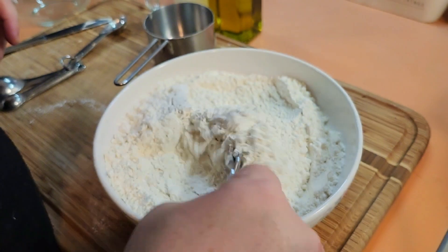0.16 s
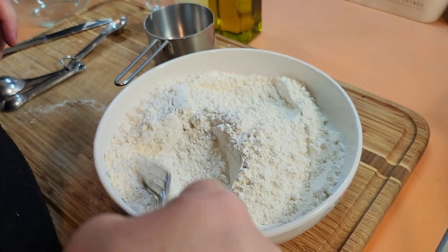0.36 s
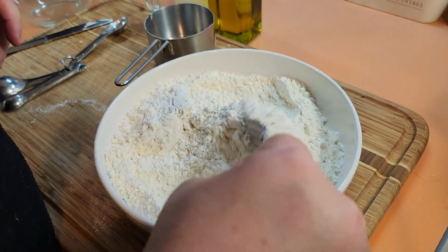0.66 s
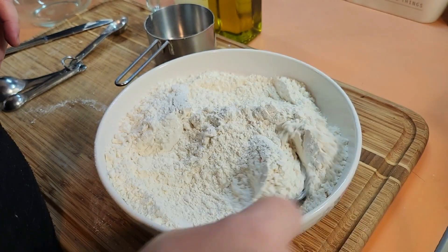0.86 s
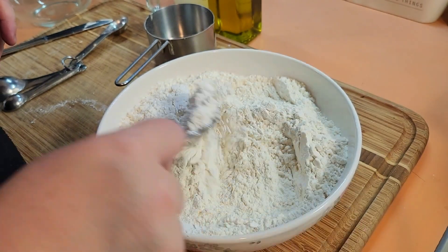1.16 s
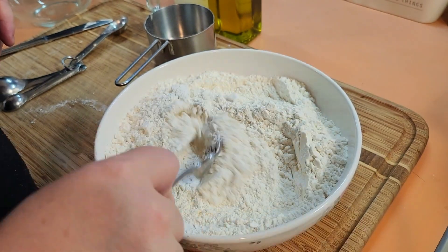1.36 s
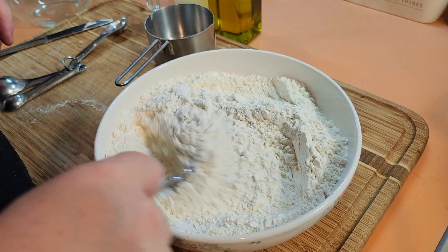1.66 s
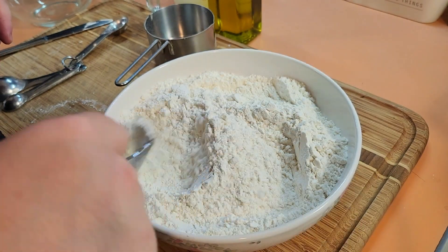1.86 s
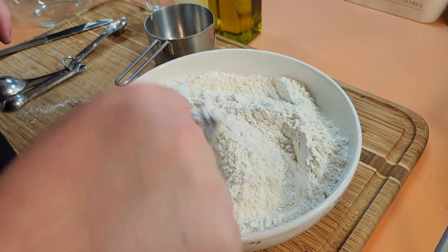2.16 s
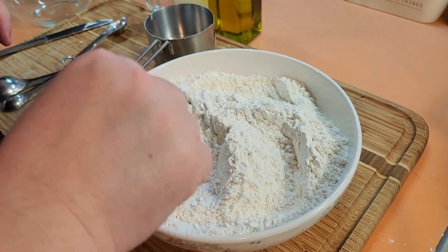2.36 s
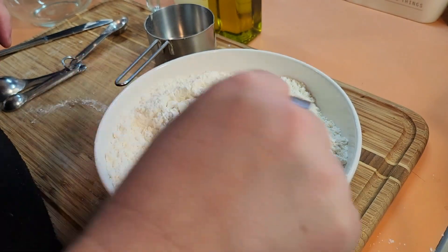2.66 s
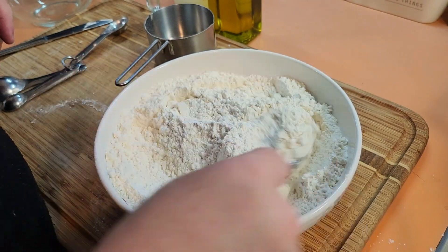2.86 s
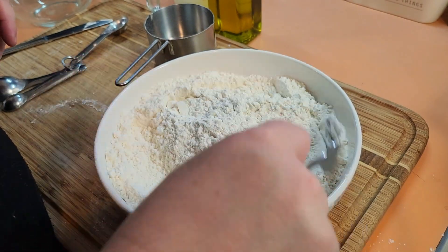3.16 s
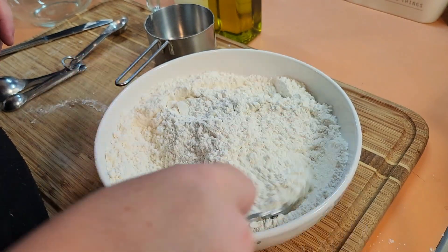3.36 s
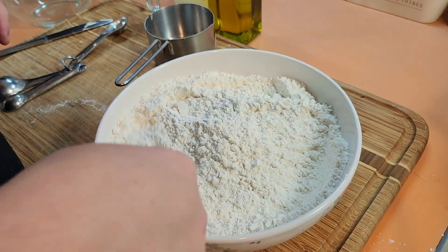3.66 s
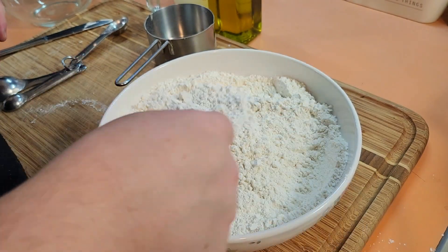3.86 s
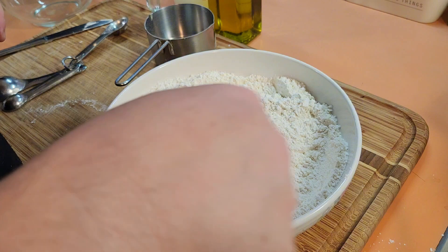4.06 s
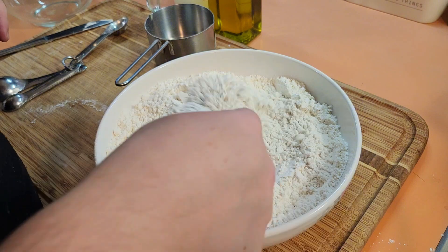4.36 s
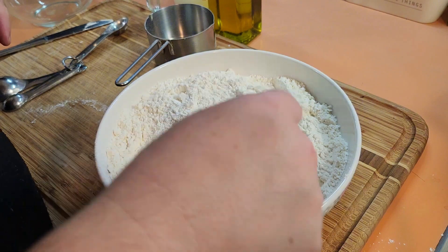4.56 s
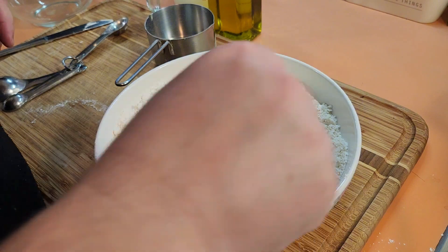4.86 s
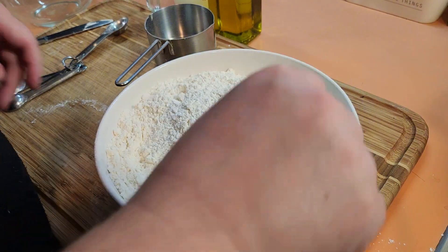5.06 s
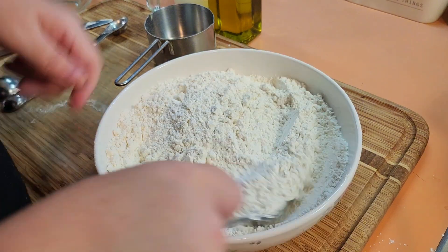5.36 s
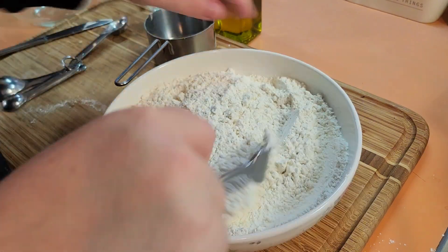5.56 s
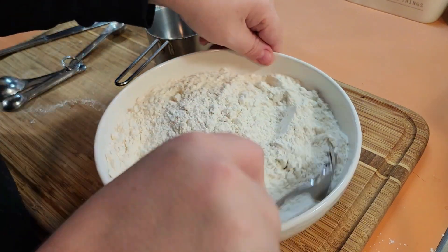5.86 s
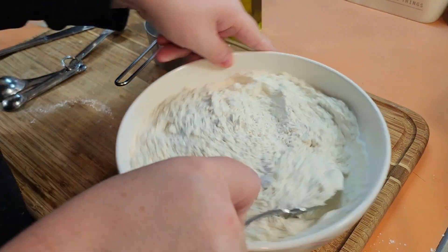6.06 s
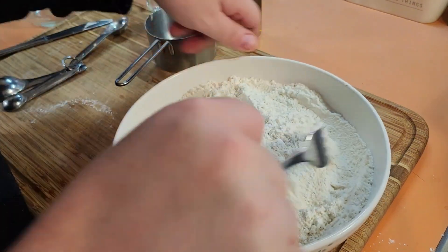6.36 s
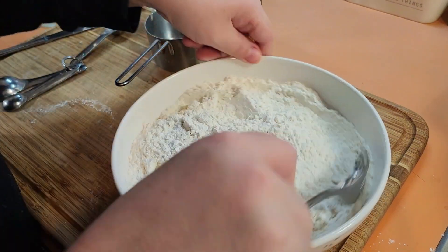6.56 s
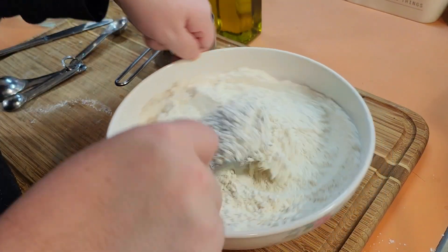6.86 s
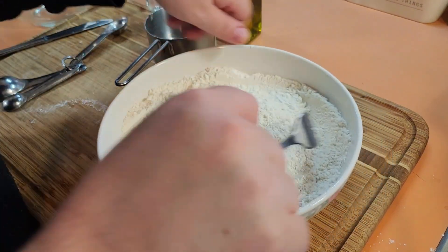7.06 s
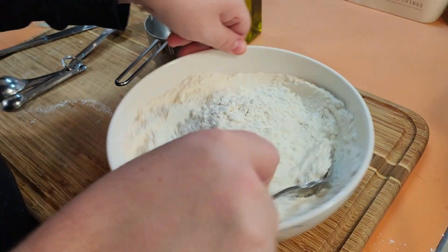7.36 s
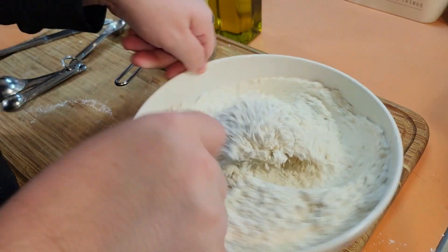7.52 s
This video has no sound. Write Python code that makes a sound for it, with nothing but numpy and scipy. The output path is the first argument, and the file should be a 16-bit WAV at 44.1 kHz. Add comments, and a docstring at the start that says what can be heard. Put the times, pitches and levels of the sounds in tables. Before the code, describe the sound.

Dull cushioned knocks and hissing fork strokes through flour in a ceramic bowl, a brief piercing tine squeal early, then hollow drags across a wooden board.

```python
"""A steel fork stirs dry flour in a ceramic bowl on a wooden board in a small kitchen.
Landings excite decaying modes of board and bowl, cushioned by flour; dense random slips through the
fork's resonances make the tines hiss on dusty glaze, and heaps of flour tumble with filtered slips.
Once the tines screech on bare glaze, as judder plus locked modes; late on, shoves grind the bowl's
foot over the board. Counter rumble and room noise are filtered noise."""
import sys
import numpy as np
from scipy import signal
from scipy.fft import rfft, irfft, next_fast_len
from scipy.io import wavfile
from scipy.ndimage import uniform_filter1d

SR = 44100
rng = np.random.default_rng(int(sys.argv[2]) if len(sys.argv) > 2 else 0)


def digitize_waveform(pressure):
    """Quantize a signal to 16-bit integers and store it at the path in sys.argv[1].

    Rows of a 2-D input are taken as channels; values are limited to [-1, 1].
    """
    field = np.atleast_2d(pressure).T
    bounded = np.clip(field, -1, 1)
    quanta = np.round(bounded * 32767).astype(np.int16)
    wavfile.write(sys.argv[1], SR, quanta)


N = 339129
TIME_S = np.arange(N) / SR
RING_S = TIME_S[:SR // 2]  # time axis of one ringing event

# modes of the ceramic wall: mode_hz, level_db, t60_s (undamped)
BOWL_MODES = [(1125, -4, .12), (1345, -4, .16), (1707, -8, .17), (1830, -12, .18), (2104, -4, .15),
              (2353, -8, .14), (2736, -2, .09), (2914, -1, .12), (3267, -5, .1), (3644, -11, .1),
              (4205, -5, .22), (4300, -3, .18), (5590, -3, .14), (5900, -12, .16), (7197, -12, .12),
              (7750, -8, .09), (7994, -13, .12), (9921, -16, .07), (10720, -16, .08)]
# shoves that drag the bowl over the board: top_s (fastest), rise_s, fall_s, level_db
SHOVES = [(6.018, 0.23, 0.31, -45), (6.67, 0.2, 0.23, -50.5), (6.89, 0.13, 0.17, -47.5),
          (7.422, 0.23, 0.31, -45)]


def undb(db):
    """Decibels to gain."""
    return 10 ** (np.asarray(db) / 20)


def unit(x):
    """Scale to rms 1."""
    return x / np.sqrt(np.mean(x ** 2))


def fade(t_s, t60_s):
    """Exponential decay by 60 dB in t60_s."""
    return np.exp(-np.log(1000) * t_s / t60_s)


def shape(x, gain):
    """Filter by a gain given as a function of frequency."""
    size = next_fast_len(x.shape[-1] + 4096)
    hz = np.maximum(np.arange(size // 2 + 1) * SR / size, 1)
    return irfft(rfft(x, size) * gain(hz), size)[..., :x.shape[-1]]


def colour(x, points):
    """Filter by a spectrum of (Hz, dB) points, interpolated over log frequency."""
    at_hz, db = np.transpose(points)
    return shape(x, lambda hz: undb(np.interp(np.log(hz), np.log(at_hz), db)))


def add(out, start_s, x):
    """Mix x in at start_s, cutting what lies outside."""
    start = int(start_s * SR)
    x = x[..., max(-start, 0):N - start]
    first = max(start, 0)
    out[..., first:first + x.shape[-1]] += x


def pan(db):
    """Left and right gains; db is left minus right."""
    return undb(np.array([[db], [-db]]) / 2)


def walk(rate_hz):
    """Smooth random wander of spread near 1."""
    size = int(SR / rate_hz)
    steps = np.repeat(rng.standard_normal(N // size + 1), size)
    smooth = uniform_filter1d(uniform_filter1d(steps, size), size)
    return 1.3 * smooth[:N]


def slips(rate_hz, spread_db):
    """Tiny random slips of uneven size; each reaches the two channels with its own weight."""
    hits = rng.random(N) < rate_hz / SR
    sizes = undb(spread_db * rng.standard_normal(N))
    return hits * sizes * rng.standard_normal((2, N))


def swell(top_s, rise_s, fall_s):
    """The samples of one push, and its pressure, which sets in quickly, builds to the top and lets go."""
    begin_s, end_s = top_s - rise_s, top_s + fall_s
    span = slice(max(int(begin_s * SR), 0), int(end_s * SR))
    return span, np.interp(TIME_S[span], [begin_s, top_s, end_s], [0, 1, 0]) ** .7


def mode(hz, t60_s):
    """One freely ringing resonance: a decaying sine."""
    return np.sin(2 * np.pi * hz * RING_S) * fade(RING_S, t60_s)


def fork(x, flicker_db):
    """Friction through the fork's broad resonances, each coming and going as the contact moves."""
    # centre_hz, width_hz, level_db
    resonances = [(1200, 3300, -3.5), (2030, 630, 0.5), (4110, 1500, -1.5), (5620, 390, -3), (7810, 720, 1),
                  (9230, 820, -11.5), (12000, 630, -3.5)]
    out = 0
    for f, width, db in resonances:
        band = shape(x, lambda hz: 1 / (1 + 1j * (hz / f - f / hz) * f / width) ** 1.18)
        out = out + band * undb(db + flicker_db * walk(rate_hz=43))
    return out


def thud(cushion_hz, weight_db):
    """A blow into the board: flour cushions the upper modes, a heavy hand drives the lower ones."""
    # bowl, board and counter together: mode_hz, level_db, t60_s (nominal, before spot and weight)
    board_modes = [(54.6, -19, 0.24), (122, -15, 0.24), (197, -19, .1), (286, -8.5, 0.28),
                   (330, -3.5, 0.31), (374.1, 3.5, 0.064), (480.4, -0.5, 0.091), (568, -6, 0.065),
                   (640, -3.5, .12), (761, 1.5, 0.068), (835, 1, 0.048)]
    body = 0
    spot = rng.standard_normal((len(board_modes), 2))  # each spot of the bowl favours other modes
    for k, (hz, db, t60_s) in enumerate(board_modes):
        gain = undb(db + weight_db / (1 + (hz / 290) ** 4) + 2 * spot[k, 0])
        sign = (-1) ** (k // 3)
        body = body + gain * mode(hz * (1 + 0.011 * spot[k, 1]), t60_s) * sign
    body = body * np.minimum(0.51 + RING_S / 0.028, 1)  # the load builds as the four tines bed in
    body = body * (1 + 2.4 * np.exp(-(RING_S / .021) ** 2))  # the pressing fork soon damps the first swings
    body = signal.sosfilt(signal.butter(4, cushion_hz, fs=SR, output="sos"), body)
    return body / np.abs(body).max()


def knocks():
    """Each landing thuds, the tines chatter for a moment and the bowl rings, choked by the flour."""
    # fork landings, relative levels: start_s, thud_db, cushion_hz (cut-off), hand_weight_db, tick_db, ring_db
    landings = [(-.008, -29, 820, 7, -68, -58), (0.417, -36, 780, 5, -70, -58),
                (0.855, -33, 673, 16, -52, -90), (1.557, -25.5, 990, -13.5, -44, -41.5),
                (1.918, -27, 845, 4.5, -46.5, -48), (2.388, -23, 1096, 2, -52, -71),
                (2.772, -29.5, 604, 10, -45.5, -59.5), (3.188, -32, 395, -4, -45.5, -56),
                (4.232, -66, 500, 3.5, -52, -61), (4.633, -30.5, 460, 0.5, -48, -48.5),
                (5.010, -23.5, 790, 11.5, -38.5, -50), (5.390, -55, 605, -0.5, -48.5, -49),
                (5.730, -29, 693, 7.5, -42, -83), (6.473, -22, 667, 2.5, -34, -45.5),
                (7.128, -27, 767, 8.5, -46.5, -73.5)]
    # dull jolts of the bowl on the board: start_s, level_db, cushion_hz (cut-off)
    jolts = [(.906, -35, 130), (5.968, -32, 448), (6.029, -29.5, 500), (6.494, -42, 363), (6.612, -34, 240),
             (6.854, -39, 330), (7.423, -31, 420)]
    soft_ring_hz, hard_tick_db = 2330, -29.5  # a soft tick rings near this pitch; a hard one, an octave higher
    low, high = np.zeros(N), np.zeros((2, N))
    chatter = unit(fork(slips(rate_hz=2400, spread_db=3.0), flicker_db=5))
    for start_s, db, cushion_hz, weight_db, tick_db, ring_db in landings:
        add(low, start_s, undb(db) * thud(cushion_hz, weight_db))
        age_s = np.maximum(TIME_S - start_s, 0)
        high += undb(tick_db - 9.0) * chatter * np.minimum(age_s / 0.0029, 1) * fade(age_s, t60_s=0.11)
        # harder contact rings higher modes of the wall
        ring_hz = soft_ring_hz * (1 + undb(tick_db - hard_tick_db))
        ring = 0
        for hz, mode_db, t60_s in BOWL_MODES:
            detour_db = 10 * abs(np.log2(hz / ring_hz))  # 10 dB per octave away from ring_hz
            gain = undb(mode_db - detour_db + 2 * rng.standard_normal((2, 1)))
            ring = ring + gain * mode(hz, .5 * t60_s)
        add(high, start_s, undb(ring_db) * np.minimum(RING_S / 0.0039, 1) * ring / ring.std() / 10)
    for start_s, db, cushion_hz in jolts:
        add(low, start_s, undb(db) * thud(cushion_hz, weight_db=-3.5))
    return low * pan(db=3.0) + high


def wall(x, width_hz, boost_db):
    """Rubbing brings out the bowl's modes, broadened by the flour lying on them."""
    def gain(hz):
        modes = sum(undb(db) / (1 + 2j * (hz - f) / width_hz) for f, db, _ in BOWL_MODES)
        return 1 + undb(boost_db) * modes
    return shape(x, gain)


def scrapes():
    """Powder crushed between tines and glaze: dense slips that swell and stop as the fork lifts."""
    # tines sliding on floury glaze: top_s (loudest), length_s, level_db, tilt_db_per_octave
    slides = [(0.043, 0.65, -58, -3), (0.488, 0.17, -52, 1), (1.618, 0.16, -55, -1),
              (2.011, 0.094, -52.5, 3), (2.467, 0.052, -43, 1), (2.863, 0.12, -54, 0),
              (3.377, 0.072, -58.5, -5), (3.547, 0.71, -58.5, -2.5), (4.287, 0.12, -61, -1),
              (4.664, 0.075, -58, -2), (5.23, 0.47, -67, 1.5), (5.397, 0.059, -53, -0.5),
              (6.618, 0.13, -58, 3), (7.345, 0.38, -64.5, 8.5)]
    rise_share = 0.57  # part of a scrape spent building pressure
    shove_hiss_db, shove_tilt_db = -21, 4.9  # relative to the shove; per octave
    out = np.zeros((2, N))
    uneven_slips = slips(rate_hz=6000, spread_db=3.5) * undb(2 * walk(rate_hz=350))
    friction = wall(fork(uneven_slips, flicker_db=1.8), width_hz=31, boost_db=-2.5)
    friction = friction * undb(1.3 * walk(rate_hz=70))  # small lumps make the friction uneven
    strokes = [(top_s, rise_share * length_s, (1 - rise_share) * length_s, db, tilt_db)
               for top_s, length_s, db, tilt_db in slides]
    strokes += [(top_s, rise_s, fall_s, db + shove_hiss_db, shove_tilt_db)
                for top_s, rise_s, fall_s, db in SHOVES]
    for top_s, rise_s, fall_s, db, tilt_db in strokes:
        span, pressure = swell(top_s, rise_s, fall_s)
        spacing_hz = rng.uniform(881, 2280)  # the point of contact sits on the nodes of some modes

        def contact_gain(hz):
            return undb(tilt_db * np.log2(hz / 5000) + 2.0 * np.cos(2 * np.pi * hz / spacing_hz))
        out[:, span] += undb(db) * pressure * unit(shape(friction[:, span], contact_gain))
    return out * pan(db=1.0)


def heaps():
    """Flour shoved over by the fork tumbles against the bowl with a soft, hollow rustle."""
    # top_s (loudest), length_s, level_db
    tumbles = [(0.053, 0.68, -64.5), (0.965, 0.12, -47), (3.037, 0.086, -64), (3.704, 0.095, -59),
               (4.534, 0.18, -64.5)]
    # tumbling flour in the hollow of the bowl: freq_hz, level_db
    hollow = [(30, -30), (110, -12), (220, -4), (330, 0), (480, -2), (750, -6), (1100, -18), (2000, -31),
              (8000, -50)]
    rise_share = 0.1  # part of a tumble spent gathering speed
    out = np.zeros(N)
    rustle = colour(slips(rate_hz=3200, spread_db=3)[0], hollow)
    for top_s, length_s, db in tumbles:
        span, pressure = swell(top_s, rise_share * length_s, (1 - rise_share) * length_s)
        out[span] += undb(db) * pressure * unit(rustle[span])
    return out * pan(db=5.0)


def background():
    """The counter rumbles at its two lowest modes, more when the arm leans or drags, over faint room noise."""
    # the stirring arm leans on the counter: top_s, level_db
    arm_leans = [(.08, -56), (1.48, -57.5), (2.2, -64), (2.48, -53.5), (3.56, -60.5)]
    # room noise: freq_hz, level_db
    air_spectrum = [(20, -38), (60, -5.5), (120, -2.5), (190, -16.5), (320, -11), (480, -17), (900, -15.5),
                    (1400, -30), (2000, -20), (3000, -32.5), (4500, -25), (9000, -31.5), (15500, -34.5)]
    counter_spectrum = [(20, -49), (38, -18), (53, 2.0), (78, -18.0), (112, -3.5), (135, -15.5),
                        (175, -24.5), (500, -44), (2000, -70.5)]  # freq_hz, level_db
    shake = undb(-65.5 + walk(rate_hz=8))  # the rumble between leans wanders by about 1 dB
    pushes = [(top_s, 0.3, 0.089, db) for top_s, db in arm_leans]
    pushes += [(top_s, rise_s, fall_s, db - 8) for top_s, rise_s, fall_s, db in SHOVES]
    for top_s, rise_s, fall_s, db in pushes:
        span, pressure = swell(top_s, rise_s, fall_s)
        shake[span] = np.hypot(shake[span], undb(db) * pressure)
    counter = unit(colour(rng.standard_normal(N), counter_spectrum))
    common, separate = rng.standard_normal(N), rng.standard_normal((2, N))
    air = unit(colour(common + 1.7 * separate, air_spectrum))
    return shake * counter * pan(db=-4.0) + undb(-69.5 + walk(rate_hz=4)) * air


def screech():
    """Tines judder on bare glaze, bite harder, then let go and leave the bowl ringing."""
    # modes on which the slipping tines lock in turn: top_s, mode_hz, rms_db, growth_s, left_minus_right_db
    squeals = [(.916, 2914, -27, .02, 0), (.922, 4215, -26, .02, 0), (.921, 8878, -29, .009, -7),
               (.908, 12640, -39, .014, -3), (.908, 14695, -43, .009, 6)]
    # rasp: freq_hz, level_db
    rasp_spectrum = [(30, -45.5), (60, -16.5), (170, -22.5), (400, -1.5), (650, -17.5), (1200, -5.5),
                     (1550, -6), (2600, -6), (4300, -5), (4950, -14.5), (5600, -4.5), (6800, -14.5),
                     (7800, -9), (10600, -15.5), (11600, -28), (13000, -17), (15500, -26.5)]
    start_s, bite_s, end_s = .883, .904, .927
    first_db, rasp_db, ring_db = -4, -23, -26  # first_db: grip before the bite
    time_s = RING_S + start_s
    grip = np.interp(time_s, [start_s, start_s + 0.00033, bite_s - .001, bite_s, end_s, end_s + 0.0081],
                     [0, undb(first_db), undb(first_db), 1, 1, 0])
    judder_phase = 2 * np.pi * np.cumsum(600 + 120 * walk(rate_hz=300)) / SR
    judder = slips(rate_hz=9000, spread_db=3.0) * np.sqrt(1 + .5 * np.sin(judder_phase))
    judder = judder[:, :len(RING_S)] * grip
    hard = grip > .9  # levels are set over the hard bite
    rasp = colour(judder, rasp_spectrum)
    ring = 0
    for hz, db, t60_s in BOWL_MODES:
        swing = signal.fftconvolve(judder, mode(hz, t60_s)[None])[:, :len(RING_S)]
        ring = ring + undb(db) * swing / swing.std(axis=1, keepdims=True)
    # flour falls back on the wall and damps it
    ring = ring * (0.3 + 0.63 * fade(np.maximum(time_s - end_s, 0), t60_s=0.15))
    sound = undb(rasp_db) * rasp / rasp[:, hard].std() + undb(ring_db) * ring / ring[:, hard].std()
    for top_s, hz, db, growth_s, side_db in squeals:
        age_s = time_s - top_s
        lock = np.exp(np.minimum(age_s, 0) / growth_s) * fade(np.maximum(age_s, 0), t60_s=.09)
        phase = 2 * np.pi * np.cumsum(hz + 18 * walk(rate_hz=360)[:len(RING_S)]) / SR
        tone = np.sqrt(2) * np.sin(phase + np.array([[0], [1]]))  # right leads by 1 rad
        sound = sound + undb(db) * pan(side_db) * lock * tone
    out = np.zeros((2, N))
    add(out, start_s, sound)
    return out


def drags():
    """The bowl's rough foot sticks and slips on wood: a hollow rumble, with more grit the faster it slides."""
    # both spectra: freq_hz, level_db
    rumble_spectrum = [(40, -34), (55, -35), (85, -13), (125, -9.5), (170, -19.5), (230, -23.5), (270, 2.5),
                       (340, -3), (440, -6.5), (600, -13.5), (900, -17.5), (1500, -47)]
    grit_spectrum = [(500, -22), (800, 5), (1100, 0), (1800, -0.5), (2600, -9), (3400, -8), (4200, -7),
                     (5100, -11), (7000, -18), (8200, -15), (11000, -34), (16000, -34.5)]
    rumble_power, grit_power = 2.3, 2.8  # amplitude grows as these powers of the speed
    catch = undb(1.59 * walk(rate_hz=90))
    rumble = colour(slips(rate_hz=1100, spread_db=2.5)[0] * catch, rumble_spectrum)
    rumble = unit(rumble) * pan(db=3.0)
    grit = colour(slips(rate_hz=7000, spread_db=1.5) * catch ** 1.5, grit_spectrum)
    grit = unit(wall(grit, width_hz=180, boost_db=-1.0)) * pan(db=1.2)
    out = np.zeros((2, N))
    for top_s, rise_s, fall_s, db in SHOVES:
        span, effort = swell(top_s, rise_s, fall_s)
        speed = np.sin(np.pi / 2 * effort)  # the bowl's weight rounds off the top of the shove
        grind = speed ** rumble_power * rumble[:, span] + undb(-4) * speed ** grit_power * grit[:, span]
        out[:, span] += undb(db) * grind
    return out


def room(x, early_db, tail_db, low_t60_s=0.48):
    """Quick reflections from counter and cupboards, then a short darkening tail; bass alike in both channels."""
    out = x
    # t60 in s of bass, middle and treble
    for db, bass_t60, middle_t60, treble_t60 in ((early_db, 0.049, 0.049, 0.049),
                                                 (tail_db, low_t60_s, 0.42, 0.21)):
        noise = rng.standard_normal((3, len(RING_S)))
        bass = shape(noise[0], lambda hz: 1 / np.sqrt(1 + (hz / 600) ** 4))
        upper = shape(noise[1:], lambda hz: 1 / np.sqrt(1 + (600 / hz) ** 4))
        middle = shape(upper, lambda hz: 1 / (1 + (hz / 5500) ** 4))
        treble = upper - middle
        echo = bass * fade(RING_S, bass_t60) + middle * fade(RING_S, middle_t60)
        echo = echo + treble * fade(RING_S, treble_t60)
        echo = unit(echo * (RING_S > .003)) / np.sqrt(len(RING_S))  # unit energy after a 3 ms gap
        out = out + undb(db) * signal.fftconvolve(x, echo, axes=1)[:, :N]
    return out


def scene():
    """Fork, bowl and board in the kitchen."""
    landing = room(knocks(), early_db=-1.0, tail_db=-7.5, low_t60_s=0.4)
    squeal = room(screech(), early_db=-14.5, tail_db=-12.5)
    sliding = room(scrapes() + heaps() + drags(), early_db=-3.0, tail_db=-6)
    return landing + squeal + sliding + background()


def record(dry):
    """A steep low-pass cuts the top above 15.8 kHz."""
    return signal.sosfilt(signal.ellip(10, .2, 80, 15800, fs=SR, output="sos"), dry)


dry = scene()
out = record(dry)
digitize_waveform(out)
```